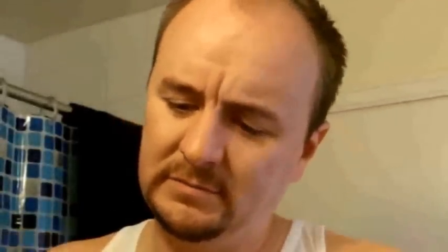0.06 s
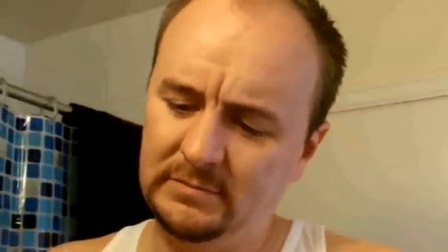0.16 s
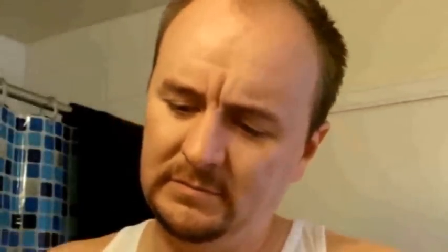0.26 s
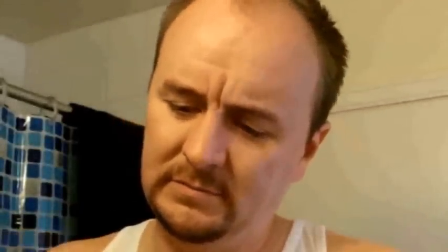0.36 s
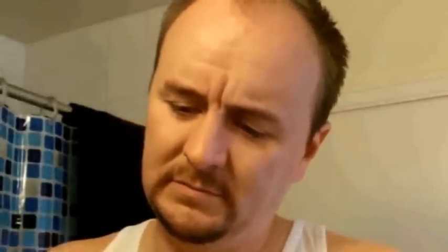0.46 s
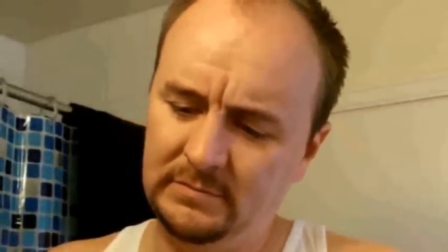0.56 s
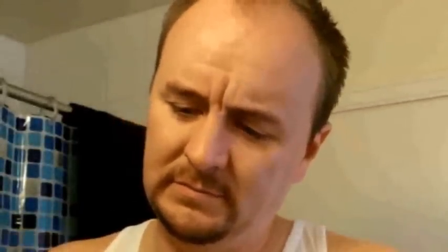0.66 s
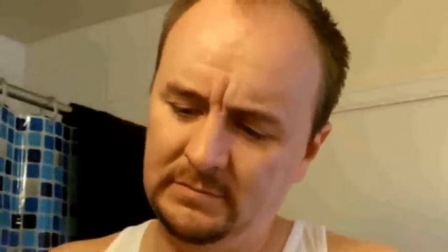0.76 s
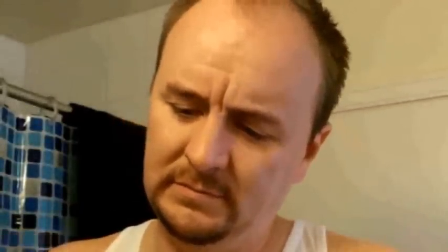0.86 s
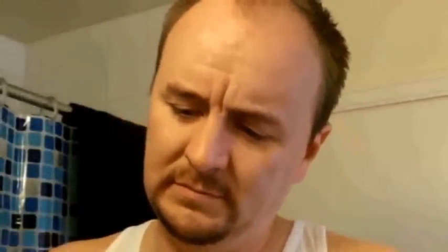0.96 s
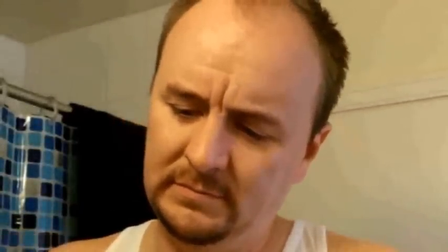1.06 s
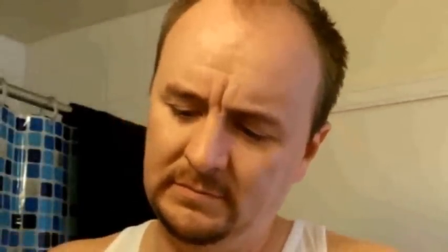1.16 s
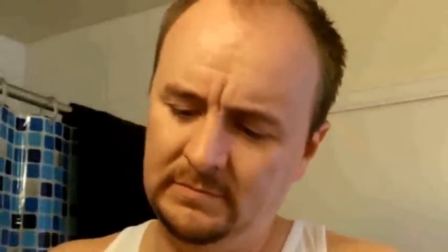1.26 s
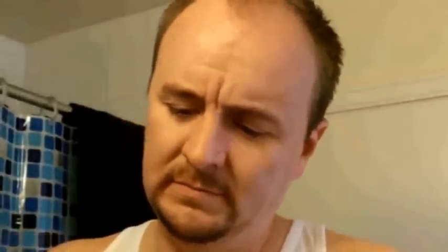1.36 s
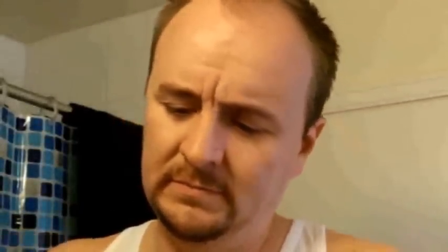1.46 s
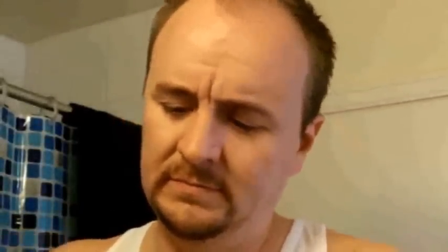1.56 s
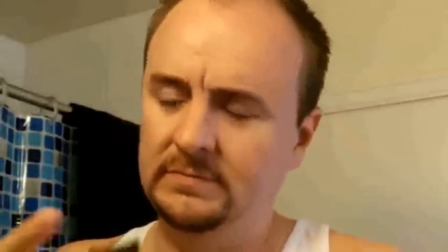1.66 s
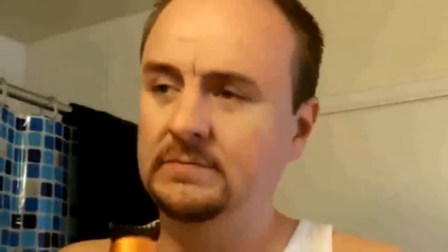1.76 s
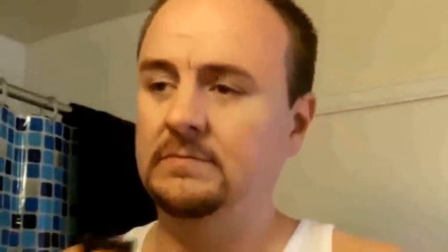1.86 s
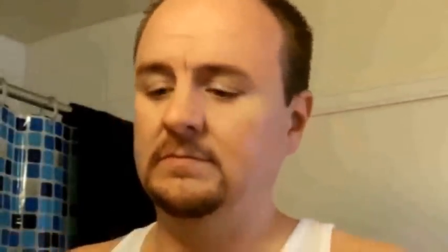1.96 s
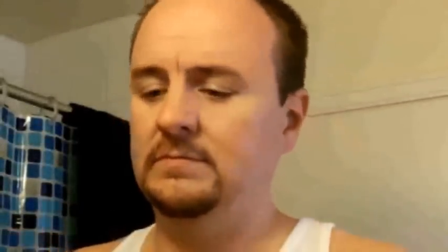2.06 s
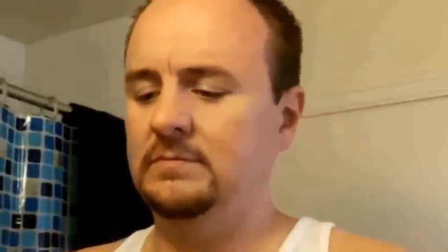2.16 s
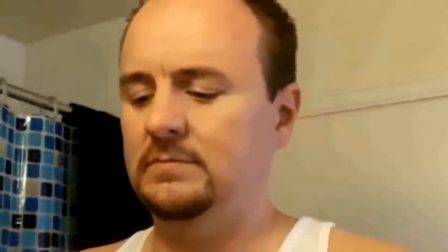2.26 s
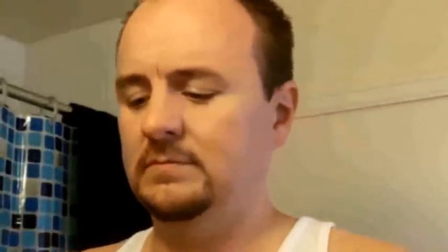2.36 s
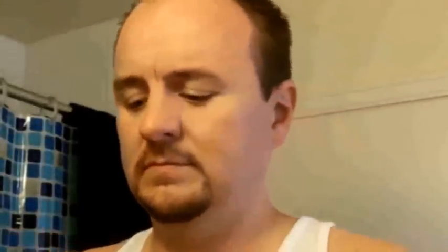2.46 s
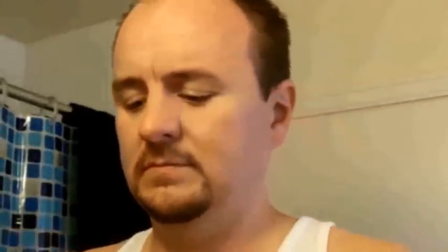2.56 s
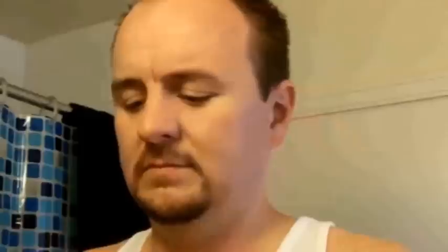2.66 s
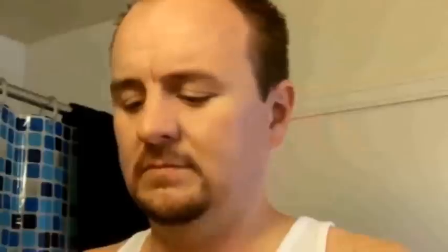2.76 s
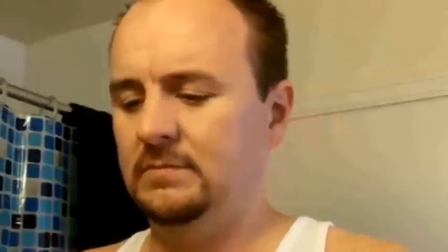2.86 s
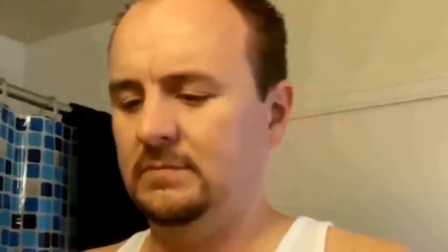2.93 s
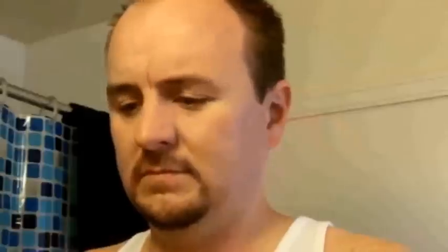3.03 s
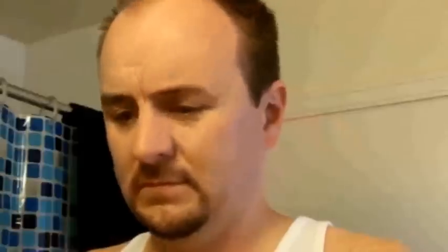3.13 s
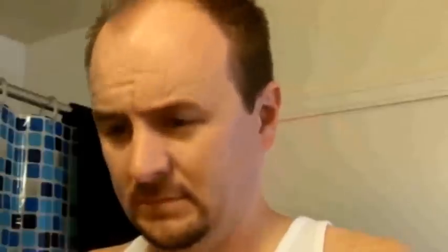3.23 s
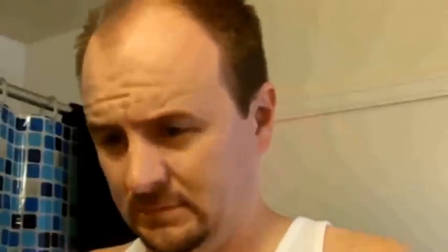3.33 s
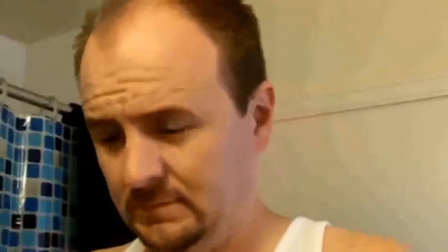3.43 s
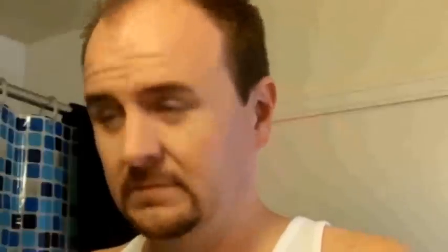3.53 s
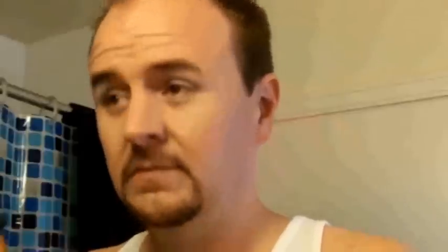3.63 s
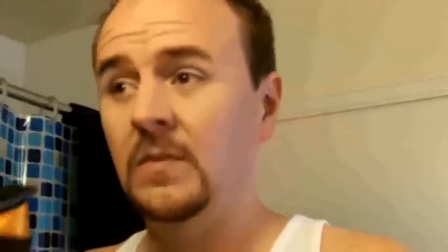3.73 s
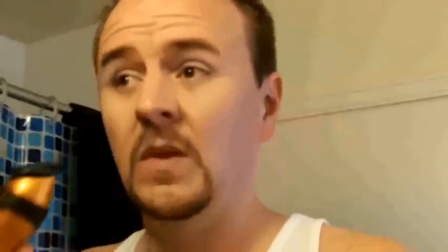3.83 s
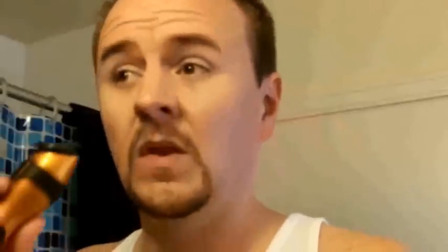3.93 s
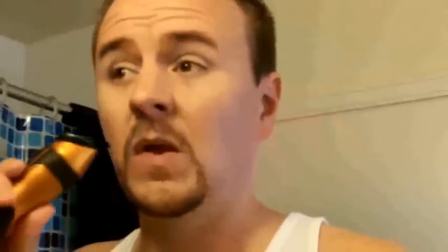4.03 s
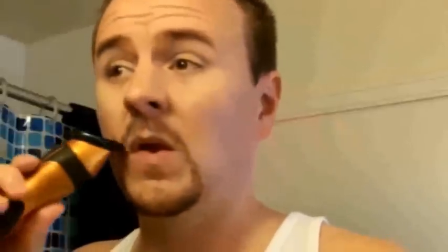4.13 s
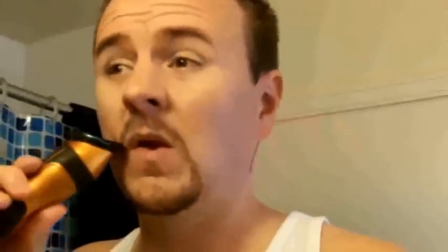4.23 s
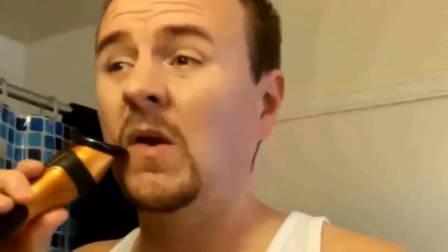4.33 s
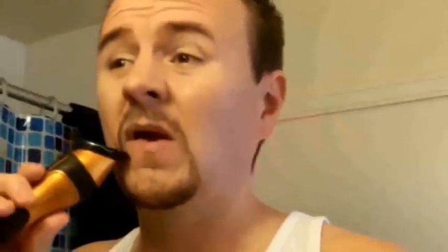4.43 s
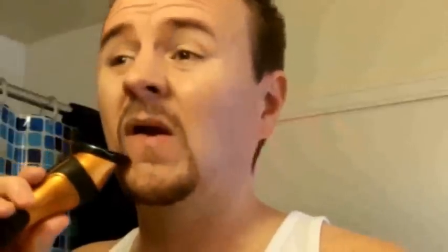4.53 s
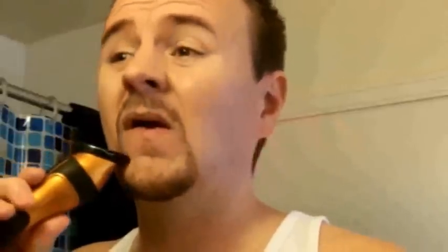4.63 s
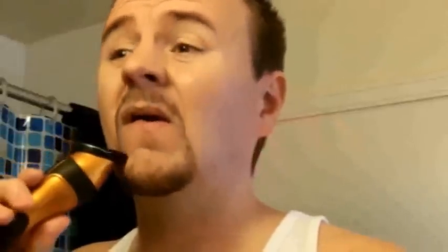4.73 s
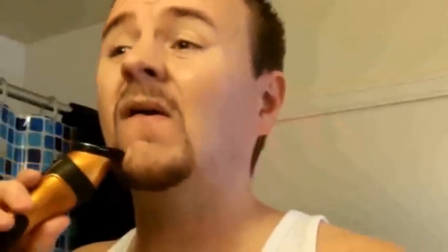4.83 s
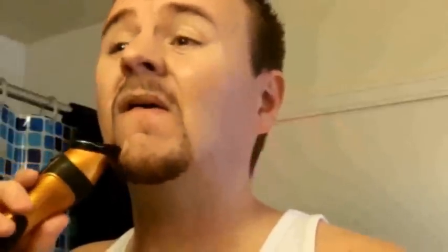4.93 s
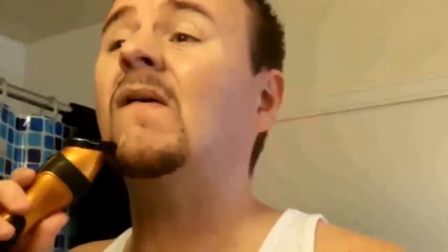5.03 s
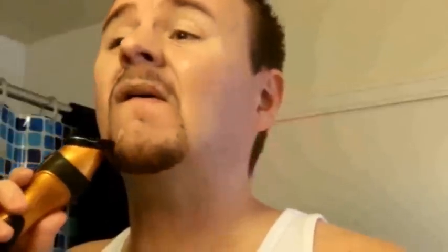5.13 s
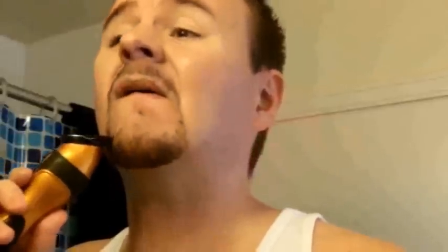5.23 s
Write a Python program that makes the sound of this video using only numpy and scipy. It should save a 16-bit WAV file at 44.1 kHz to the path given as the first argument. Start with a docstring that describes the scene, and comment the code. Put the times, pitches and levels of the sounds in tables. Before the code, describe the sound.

An attachment rattles and snaps onto a beard trimmer, a near-quiet pause follows, then the motor jumps on and buzzes to the end.

```python
"""Plastic ticks, scrapes and snaps as a comb is fitted to a beard trimmer in a small bathroom.
The switch clicks, the motor surges up and the blade buzzes, as orders of the shaft, on its way to the chin.
Drag on the teeth lowers the speed and adds rattle; the changing speed carries four orders onto resonances.
Plastic contacts are random slips through a ringing body; echoes are decaying noise; hum and hiss fill the room.
The recorder's gain control ducks after the loudest snaps, then recovers."""
import sys
import numpy as np
from scipy import signal
from scipy.fft import rfft, irfft, next_fast_len
from scipy.io import wavfile
from scipy.ndimage import uniform_filter1d, minimum_filter1d

SR = 44100
rng = np.random.default_rng(int(sys.argv[2]) if len(sys.argv) > 2 else 0)


def unload_audio(sound):
    """Save the sound as a 16-bit wav file, at the path given as the first command line argument."""
    columns = np.transpose(np.atleast_2d(sound))
    # keep every value between -1 and 1, then stretch to whole-number steps
    steps = np.round(np.clip(columns, -1, 1) * 32767)
    wavfile.write(sys.argv[1], SR, steps.astype(np.int16))


N = 233199
T = np.arange(N) / SR  # sample times, s
FRAMES = np.arange(0, N / SR + .01, 1 / 200)  # control times, s


def amp(db):
    """Decibels to gain."""
    return 10 ** (np.asarray(db) / 20)


def unit(x):
    """Scales to rms 1."""
    return x / np.sqrt(np.mean(x ** 2) + 1e-20)


def read(points, hz):
    """Interpolates a table on a log-frequency axis."""
    f, value = np.transpose(points)
    return np.interp(np.log(hz + 1), np.log(f + 1), value)


def curves(rows, at=T):
    """Every column of a timed table at the given times."""
    s, *columns = np.transpose(rows)
    return [np.interp(at, s, c) for c in columns]


def add(mix, s, sound):
    """Lays a sound into the mix at time s."""
    part = mix[round(s * SR):][:len(sound)]
    part += sound[:len(part)]


def drift(per_s, at=T):
    """Smooth random wander of about unit size."""
    knots = rng.standard_normal(4096)
    return np.interp(at * per_s, np.arange(len(knots)), knots) * np.sqrt(3 / 2)


def ring(gain_db, size=2048):
    """Causal impulse response, of energy 1, with the given gain shape over frequency."""
    log_gain = np.log(amp(gain_db(abs(np.fft.fftfreq(size, 1 / SR)))))
    minimum_phase = np.exp(np.conj(signal.hilbert(log_gain)))
    response = np.fft.ifft(minimum_phase).real
    return response / np.linalg.norm(response)


def colour(x, points):
    """Passes x through a body with this spectrum."""
    return signal.oaconvolve(x, ring(lambda hz: read(points, hz)))[:N]


def equalise(x, points):
    """Shapes x by a smooth spectrum, without phase shift."""
    size = next_fast_len(N + 2048, real=True)
    gain = amp(read(points, np.fft.rfftfreq(size, 1 / SR)))
    return irfft(rfft(x, size) * gain, size)[:N]


# motor speed under load, once spun up: start_s, speed_turns_per_s
MOTOR_SPEED = [(3.76, 95.3), (3.92, 95.3), (4.05, 95.67), (4.17, 96.17), (4.35, 96.4), (4.44, 96.95),
               (4.53, 96.82), (4.62, 97.1), (4.75, 97.0), (4.795, 96.1), (4.86, 96.15), (5.0, 96.6),
               (5.12, 97.05), (5.24, 97.3)]
SWITCH_ON_S, SPIN_UP_S = 3.447, .047  # spin-up is a time constant


def shaft():
    """Turns made so far, and the share of full speed: an exponential spin-up with slight flutter."""
    spun = 1 - np.exp(-np.maximum(T - SWITCH_ON_S, 0) / SPIN_UP_S)
    flutter = 1 + .001 * drift(70)
    return np.cumsum(curves(MOTOR_SPEED)[0] * spun * flutter) / SR, spun


FREE_TURNS_PER_S, SAG_TURNS_PER_S = 97.1, 0.82  # running free; drop at which drag is full
SURGE_S, SURGE_FADE_S = 0.19, 0.073  # hard shaking after switch-on, then its fade time constant
RAISE_AT_S, RAISE_S = 3.62, 0.6  # lift to the chin: start, length


def handheld(at):
    """State of the trimmer, each 0-1: starting surge, drag on the blade, how low it is held."""
    surge = np.exp(-np.maximum(at - SWITCH_ON_S - SURGE_S, 0) / SURGE_FADE_S)
    drag = np.clip((FREE_TURNS_PER_S - curves(MOTOR_SPEED, at)[0]) / SAG_TURNS_PER_S, 0, 1)
    low = .5 + .5 * np.cos(np.pi * np.clip((at - RAISE_AT_S) / RAISE_S, 0, 1))
    return surge, drag, low


# echo against the direct knock, small when the blade faces the microphone: start_s, ratio
ECHO_RATIO = [(3.6, 2.5), (3.85, 1.3), (4.0, 1.4), (4.11, 0.76), (4.21, 1.7), (4.33, 1.1), (4.45, 0.73),
              (4.75, 0.36), (4.88, 0.81), (5.29, 0.73)]
# blade knocks after the main one in each turn: turn_share, strength_ratio
LATER_KNOCKS = [(.46, 0.66), (0.779, 0.24)]


def buzz(turns, spun, tick_from_hz=2600, wander=0.33, settle=4, play_order=44, play_per_s=33,
         steel_hz=4000, steel_width_hz=1700, surge_room_share=0.72):
    """Orders of the shaft, heard directly and by wandering echoes; the room smears the surge most."""
    play, uneven_db = .26, .9
    echo = curves(ECHO_RATIO, FRAMES)[0]
    running = T > SWITCH_ON_S
    t = T[running]
    crank = np.exp(2j * np.pi * turns[running])
    rotor, tone = 1, 0
    for k, level in sorted(order_gains().items()):
        order_hz = k * FREE_TURNS_PER_S
        path = np.exp(2j * np.pi * rng.random()) + wander * (drift(6, FRAMES) + 1j * drift(6, FRAMES))
        if order_hz > tick_from_hz:
            # knocks at fixed points of the stroke keep these orders in step
            knocks = 1 + sum(strength * np.exp(-2j * np.pi * k * at) for at, strength in LATER_KNOCKS)
            path = knocks + echo * path
            # phase of the steel ringing briefly after each knock
            path = path * np.exp(-2j * np.arctan(2 * (order_hz - steel_hz) / steel_width_hz))
        # play in the blade makes each order shiver, the high ones most
        depth = play * min(k / play_order, 1) ** 0.64
        shiver = depth * (drift(play_per_s, FRAMES) + 1j * drift(play_per_s, FRAMES))
        rotor = rotor * crank
        envelope = np.interp(t, FRAMES, level * (path / abs(path) + shiver))
        tone = tone + (envelope * rotor).real
    tone *= amp(uneven_db * drift(190, t))  # uneven strokes
    tone = np.r_[np.zeros(N - len(t)), np.sqrt(2) * tone] * spun ** settle
    wet = np.clip(surge_room_share * handheld(T)[0], 0, 1)
    return np.sqrt(1 - wet) * tone + bathroom(np.sqrt(wet) * tone)


# orders of the buzz, relative within each part, whining ones apart: order_multiple, level_db
ORDER_SHARES = [(1, -43.5), (2, -52.5), (3, -24.5), (4, -21.5), (5, -23.5), (6, -32), (7, -29.5), (8, -19),
                (9, -21.5), (10, -32.5), (11, -21), (13, -20), (14, -20.5), (16, -19.5), (17, -20.5),
                (18, -24.5), (19, -19), (20, -22.5), (21, -21), (22, -10.5), (24, -13.5), (25, -20),
                (26, -25.5), (27, -21.5), (28, -11.5), (29, -13.5), (30, -23), (31, -16), (32, -10),
                (33, -21), (34, -13.5), (35, -8), (36, -9.5), (37, -8), (38, -17), (40, -17), (41, -9),
                (42, -26), (43, -10.5), (44, -12.5), (45, -9), (46, -17), (47, -24), (48, -11.5), (49, -17),
                (50, -18), (51, -9.5), (52, -17), (53, -12.5), (54, -20)]
# band of the blade picked out by the angle of the head: start_s, centre_hz
HEAD_AIM = [(3.87, 3320), (4.0, 3540), (4.11, 4800), (4.22, 4900), (4.32, 3770), (4.5, 4200), (4.81, 4330),
            (5.0, 3800), (5.29, 4260)]
# shaft orders that whine, one for each resonance below: order_multiple
WHINING_ORDERS = [12, 15, 23, 39]
# narrow resonances: centre_hz, width_hz, peak_db, off_resonance_drop_db, away_from_skin_db, snag_damping_db
WHINE_RESONANCES = [(1159, 4.3, -38.5, 6, -6.5, 0), (1453, 2.3, -36.5, 10.5, 4, 5),
                    (2248, 27, -33.5, 6.5, -16, 10), (3780, 26, -35, 6.5, -16.5, -1)]
# tones as the moving trimmer crosses standing waves or takes load: start_s, end_s, pitch_hz, peak_db
TONE_FLARES = [(3.63, 4.0, 2670, -40.5), (3.726, 3.96, 1430, -42.5), (3.71, 3.918, 4190, -44),
               (3.76, 4.128, 3430, -40), (3.77, 3.998, 1335, -39), (3.796, 3.99, 3050, -39.5),
               (3.83, 3.944, 3810, -41), (3.886, 4.01, 3240, -44), (3.95, 4.328, 2110, -42),
               (4.01, 4.16, 3930, -37.5), (4.01, 4.226, 1530, -40), (4.067, 4.24, 4510, -37.5),
               (4.086, 4.34, 5000, -38), (4.265, 4.422, 3760, -33.5), (4.269, 4.462, 4240, -39),
               (4.354, 4.436, 3190, -36.5), (4.402, 4.52, 2230, -34), (4.445, 4.802, 1455, -38.5),
               (4.45, 4.78, 2715, -43), (4.76, 4.946, 4520, -34), (4.766, 4.968, 5000, -46),
               (4.974, 5.212, 2230, -36.5), (5.076, 5.4, 1455, -34.5)]
TOUCH_AT_S, TOUCH_S = 4.27, 0.45  # comb nears the skin: arrival, length


def order_gains(sway_db=2.0, low_sway_db=2.0, sway_per_s=8, evening=0.71, aim_db=4,
                aim_width_hz=480, top_db=-23, top_fall_db=2.0, count=18):
    """Orders share each part's power; shares sway more and are more even while held low, less near the chin."""
    top_order = ORDER_SHARES[-1][0]
    fading = [(top_order + 0.5 + k, top_db - top_fall_db * k) for k in range(count)]
    order, db = np.transpose(list(ORDER_SHARES) + fading)
    order = np.round(order).astype(int)
    part = np.digitize(order, [1.5, 10.5, 26.5])  # imbalance, motor, housing, blade
    speed, aim_hz = curves(MOTOR_SPEED, FRAMES)[0], curves(HEAD_AIM, FRAMES)[0]
    low = handheld(FRAMES)[2]
    held_low = np.sqrt(np.sqrt(low))
    aimed = np.exp(-((order[:, None] * speed - aim_hz) / aim_width_hz) ** 2)
    standing_out = db - uniform_filter1d(db, size=9)
    sway_depth_db = sway_db + low_sway_db * held_low
    sway = sway_depth_db * np.array([drift(sway_per_s, FRAMES) for _ in order])
    gain = amp(db[:, None] - evening * held_low * standing_out[:, None] + aim_db * aimed + sway)
    for p, level in enumerate(radiated()):
        gain[part == p] *= level / np.linalg.norm(gain[part == p], axis=0)
    gains = dict(zip(order, gain))
    away = np.clip((TOUCH_AT_S - FRAMES) / TOUCH_S, 0, 1)
    for k, row in zip(WHINING_ORDERS, WHINE_RESONANCES):
        gains[k] = whine(k * speed, away, *row)
    for start, end, hz, flare_db in TONE_FLARES:
        k = round(hz / np.interp((start + end) / 2, FRAMES, speed))  # nearest order carries the flare
        gains[k] = np.hypot(gains[k], flare(start, end, flare_db))
    return gains


# treble of the blade before the offsets in radiated(): start_s, level_db
BLADE_TREBLE = [(3.5, -15.5), (3.528, -32.5), (3.772, -31.5), (3.9, -27), (4.05, -27), (4.26, -30.5),
                (4.36, -27.5), (4.45, -27.5), (4.65, -28.5), (4.85, -28.5), (5.016, -26.5), (5.288, -31)]


def radiated(imbalance_db=-60, motor_db=-46.0, motor_low_db=-4, motor_surge_db=7, housing_db=-41,
             housing_drag_db=4.5, housing_surge_db=-1.5, blade_db=-3.0, blade_surge_db=-1.0):
    """Gains of imbalance, motor, housing and blade: surge shakes the motor, drag the housing."""
    surge, drag, low = handheld(FRAMES)
    return amp([np.full(len(FRAMES), imbalance_db),
                motor_db + motor_low_db * low + motor_surge_db * surge,
                housing_db + housing_drag_db * drag + housing_surge_db * surge,
                curves(BLADE_TREBLE, FRAMES)[0] + blade_db + blade_surge_db * surge])


SNAG_AT_S, SNAG_S = 4.805, 0.023  # comb catches in the beard, damping the whine: time, half length


def whine(order_hz, away, hz, width_hz, peak_db, drop_db, away_db, snag_db, waver_db=2.7):
    """Gain of an order that sings out as the speed carries it onto a resonance."""
    detuned = 1 - 1 / (1 + (2 * (order_hz - hz) / width_hz) ** 2)
    snag = np.exp(-((FRAMES - SNAG_AT_S) / SNAG_S) ** 2)
    waver = waver_db * drift(9, FRAMES)
    return amp(peak_db - drop_db * detuned + away_db * away - snag_db * snag + waver)


def flare(start, end, db):
    """Gain of a tone that swells and fades over a root-sine arch."""
    progress = np.clip((FRAMES - start) / (end - start), 0, 1)
    return amp(db) * np.sqrt(abs(np.sin(np.pi * progress)))


# spectrum of steel teeth rubbing, relative: centre_hz, level_db
TEETH_RATTLE = [(120, -36), (300, -8.5), (600, -10), (1000, -4), (1500, 2), (2200, 0.5), (2800, 0.5),
                (4000, 1.5), (5200, 0), (5800, -4), (7000, -17), (12000, -28)]


def blade(turns, spun, drag_db=2, surge_db=7, return_stroke=0.29, room_db=-4):
    """Teeth scrape hardest just after each stroke reversal; surge and drag raise the rattle."""
    level_db, rub, rub_length_strokes = -42, .25, .11
    running = T > SWITCH_ON_S
    stroke = np.floor(2 * turns)
    strength = np.where(stroke % 2, return_stroke, 1)
    gate = rub + strength * np.exp(-(2 * turns - stroke) / rub_length_strokes)
    rattle = unit(colour(gate * rng.standard_normal(N) * running, TEETH_RATTLE))
    surge, drag, _ = handheld(T)
    rattle *= spun * amp(level_db + drag_db * drag + surge_db * surge)
    rattle *= np.sqrt(np.mean(running))  # level counts running time only
    return rattle + amp(room_db) * bathroom(rattle)


# plastic on plastic; the last three are the switch and the first jolt of the blade; levels relative:
# start_s, level_db, brightness_hz, thud_db, chatter_t60_s, ring_hz
CONTACTS = [(0.3033, -15.5, 4080, -35, 0.013, 4450), (0.3053, -16, 3400, -20, 0.021, 3080),
            (0.3098, -24, 3700, -7, 0.017, 3940), (0.3125, -19.5, 3400, -8, 0.024, 3850),
            (0.3406, -19, 3330, -22, 0.022, 3870), (.3806, -19, 4160, -25, 0.0092, 4660),
            (.452, -25.5, 3300, -21, 0.029, 3180), (0.4704, -25, 4050, -16, 0.019, 4300),
            (.5174, -21, 3870, -27, 0.019, 3800), (.5192, -19, 3500, -28, 0.011, 3330),
            (0.5219, -22.5, 2900, -16, 0.03, 2880), (.542, -29.5, 3550, -2, 0.012, 3470),
            (0.565, -27.5, 3900, -9, 0.033, 4180), (0.6236, -27, 2860, -12, 0.02, 3360),
            (.6275, -33, 2500, -4, 0.035, 2500), (0.82, -32, 3240, -26, 0.031, 2920),
            (.85, -27.5, 3780, -22, 0.018, 4170), (.938, -35.5, 2450, -2, 0.045, 2170),
            (1.110, -28.5, 2660, -1, 0.056, 2530), (1.210, -34.5, 4100, -15, 0.039, 4240),
            (1.2508, -30, 4050, -31, 0.025, 4180), (1.309, -30.5, 4120, -32, 0.017, 4160),
            (1.5469, -18, 4100, -30, 0.0086, 4270), (1.6147, -23, 3800, -23, 0.02, 4100),
            (1.668, -19.5, 3960, -27, 0.015, 4530), (1.7366, -1, 5330, -7, 0.014, 4280),
            (1.7692, -0.5, 4930, -36, 0.013, 4520), (2.719, -42, 2980, -20, 0.022, 2550),
            (3.017, -35, 4200, -27, 0.022, 4200), (3.0256, -23, 5600, -29, 0.033, 3160),
            (3.4452, -18.5, 3930, -17, 0.03, 3700), (3.447, -16, 4200, -22, 0.036, 3730),
            (3.48, -28, 3500, -11, .02, 2860)]
# early echoes off hand, mirror and basin: longest_delay_s, level_db
EARLY_ECHOES = [(.0031, -12.5), (.0046, -19), (.0085, -15), (0.0113, -16)]


def clicks(chatter_db=-3, chatter_s=0.013, rebound=0.38, rebound_s=0.001397, level_db=9,
           thud_limit_db=-38, room_db=-8, snap_room_db=5, snap_from_db=-10, ring_db=5, slips_per_s=9000):
    """Each contact is a snap, a rebound and a short chatter ringing the plastic."""
    t = np.arange(4096) / SR
    direct, to_room = np.zeros(N), np.zeros(N)
    for s, db, bright_hz, low_db, t60, ring_hz in CONTACTS:
        chatter = slips(len(t), slips_per_s) * amp(-60 * t / t60)
        chatter_gain = amp(chatter_db) * t60 / chatter_s  # long contacts are mostly chatter
        force = chatter_gain * chatter / np.linalg.norm(chatter)
        force[0] += 1
        force[round(rebound_s * rng.uniform(.8, 1.2) * SR)] += rebound

        def contact(thud_db):
            """The force through the plastic, with more or less low thud, at a set energy."""
            sound = signal.fftconvolve(force, plastic(bright_hz, thud_db, ring_hz, ring_db))
            return sound * amp(db + level_db) / np.linalg.norm(sound)

        sound = contact(low_db)
        add(direct, s, sound)
        for delay, echo_db in EARLY_ECHOES:
            add(direct, s + delay * rng.uniform(.9, 1.0), sound * amp(echo_db))
        # a hard snap fills the room, but its thud stays close to the hand
        room_gain = amp(room_db + snap_room_db * (db > snap_from_db))
        add(to_room, s, contact(min(low_db, thud_limit_db - db)) * room_gain)
    return direct + bathroom(to_room)


# comb sliding on its rails: start_s, length_s, level_db, brightness_hz, thud_db
RAIL_SCRAPES = [(0.281, 0.13, -49, 3380, -5), (0.482, 0.14, -50.5, 2930, -12),
                (1.202, 0.093, -53, 3870, -16), (3.014, 0.1, -55.5, 3700, -14)]
# the handle bumps in the hand: start_s, level_db
HAND_BUMPS = [(2.847, -44), (2.866, -65)]
# hollow modes of the handle, relative: pitch_hz, level_db, t60_s
HANDLE_MODES = [(570, -11, 0.041), (740, 0.5, 0.035), (814, -4, 0.043), (1016, -10.5, 0.054)]


def handling(scrape_room_db=-10, bump_room_db=-3, grain_db=0.5, slips_per_s=3500):
    """Comb scrapes are filtered slips that swell and fade; bumps are decaying handle modes."""
    scrapes, bumps = np.zeros(N), np.zeros(N)
    friction = slips(N, slips_per_s) * amp(grain_db * drift(400))
    for s, length, db, bright_hz, low_db in RAIL_SCRAPES:
        stroke = np.sin(np.pi * np.clip((T - s) / length, 0, 1))
        rubbed = unit(signal.oaconvolve(friction, plastic(bright_hz, low_db))[:N])
        scrapes += amp(db) * stroke * rubbed
    t = np.arange(8192) / SR
    knock = sum(amp(db - 60 * t / t60) * np.sin(2 * np.pi * hz * t) for hz, db, t60 in HANDLE_MODES)
    for s, db in HAND_BUMPS:
        add(bumps, s, amp(db) * knock)
    return scrapes + bumps + bathroom(amp(scrape_room_db) * scrapes + amp(bump_room_db) * bumps)


def slips(size, per_s):
    """Tiny separate impacts of random strength."""
    return rng.standard_normal(size) * (rng.random(size) < per_s / SR)


# ring of the comb and housing, relative: centre_hz, level_db
PLASTIC_BODY = [(150, -13.5), (700, -14.5), (1400, -13), (2100, -12), (2650, -5), (3050, -7), (3500, -1),
                (4300, -1), (4650, -5.5), (4900, -5.5), (6200, -18.5), (7200, -23.5), (12000, -55.5)]


def plastic(bright_hz, thud_db, ring_hz=4000, ring_db=0, ring_width_hz=280, tilt_db=18, centre_hz=4000,
            body_db=17, ripple_db=0.9, ripple_hz=260):
    """Comb ring: hard contacts are brighter, blunt ones thud, one mode leads, the grip shifts the rest."""
    tilt = tilt_db * np.log2(bright_hz / centre_hz)  # dB per octave

    def gain_db(hz):
        """Sum of body, tilt, leading mode, random ripple and low thud."""
        tilted = tilt * np.log2(np.clip(hz, 2500, 6500) / centre_hz)
        mode = ring_db / (1 + (2 * (hz - ring_hz) / ring_width_hz) ** 2)
        ripple = ripple_db * drift(1 / ripple_hz, hz)
        thud = 0.3 * (thud_db + body_db) / (1 + (hz / 2850) ** 8)
        return read(PLASTIC_BODY, hz) + tilted + mode + ripple + thud

    return ring(gain_db, size=1024)


# decay of the bathroom: centre_hz, t60_s
BATHROOM_DECAY = [(150, 0.34), (500, 0.63), (1500, 0.48), (4000, 0.41), (7000, 0.5), (12000, 0.12)]


def bathroom(x, first_wall_s=0.002):
    """Dense echoes off hard walls: noise, each band dying at its own speed."""
    hz, t, z = signal.stft(rng.standard_normal(SR), SR, nperseg=256)
    decay = amp(-60 * t / read(BATHROOM_DECAY, hz)[:, None])
    tail = signal.istft(z * decay, SR, nperseg=256)[1]
    tail *= np.clip(np.arange(len(tail)) / SR / first_wall_s - 1, 0, 1)
    return signal.fftconvolve(x, tail / np.linalg.norm(tail))[:N]


# spectrum of the still air, relative: centre_hz, level_db
STILL_AIR = [(15, -36.5), (25, -6.5), (91, -10.5), (103, -13), (127, -4), (169, -13), (394, -11.5),
             (499, -17.5), (662, -16.5), (763, -19.5), (1250, -22), (1550, -22.5), (1960, -21.5),
             (7000, -31.5), (9100, -64.5), (15400, -120)]
# hum tones, mean rms: pitch_hz, level_db
ROOM_HUM = [(119.8, -61.5), (141, -65), (398, -75)]


def room_tone(air_db=-57.5, waver_db=2.0, hiss_db=-70):
    """Shaped noise for still air, wavering hum sines and the microphone's white hiss."""
    air = unit(equalise(rng.standard_normal(N), STILL_AIR))
    hum = 0
    for hz, db in ROOM_HUM:
        level = amp(db + waver_db * drift(5.1)) * np.sqrt(2)
        hum = hum + level * np.sin(2 * np.pi * hz * T + 0.67 * drift(5.1))
    return amp(air_db) * air + hum + amp(hiss_db) * rng.standard_normal(N)


def scene():
    """Comb, trimmer and room at one microphone."""
    turns, spun = shaft()
    return (clicks() + handling() + buzz(turns, spun) + blade(turns, spun) + room_tone())[None]


# overall tone balance, a hole near 8 kHz and a faint band near 10 kHz: centre_hz, gain_db
TONE_BALANCE = [(35, -0.5), (90, 0.5), (6600, 2.5), (7200, -2), (7600, -32), (8100, -19.5), (8500, 1.5),
                (9900, 7.5), (10600, -12.5), (11800, -10.5), (12400, -3)]


def record(dry, threshold_db=-19, squeeze=1.0, recovery_db_per_s=95, hold_samples=2401, edge_hz=12650):
    """Gain control ducks, holds and recovers; then the tone balance and band limit."""
    power = signal.lfilter(np.ones(128) / 128, [1], dry[0] ** 2)
    power_db = 10 * np.log10(power + 1e-12)
    held_db = -minimum_filter1d(-power_db, hold_samples, origin=hold_samples // 2)  # recent maximum
    fall = T * recovery_db_per_s
    recovering_db = np.maximum.accumulate(held_db + fall) - fall
    over_db = np.maximum(recovering_db - threshold_db, 0)
    smooth_db = signal.lfilter([1 / 200], [1, 1 / 200 - 1], over_db)  # 200-sample time constant
    ducked = dry[0] * amp(-squeeze * smooth_db)
    heard = equalise(ducked, TONE_BALANCE)
    band_limit = signal.firwin(511, edge_hz, window=("kaiser", 9), fs=SR)
    return signal.oaconvolve(heard, band_limit, "same")[None]


dry = scene()
out = record(dry)
unload_audio(out)
```